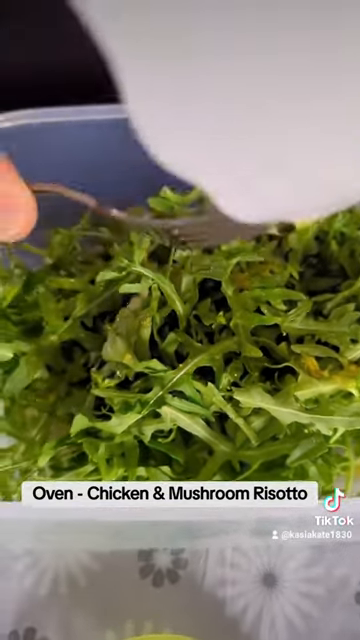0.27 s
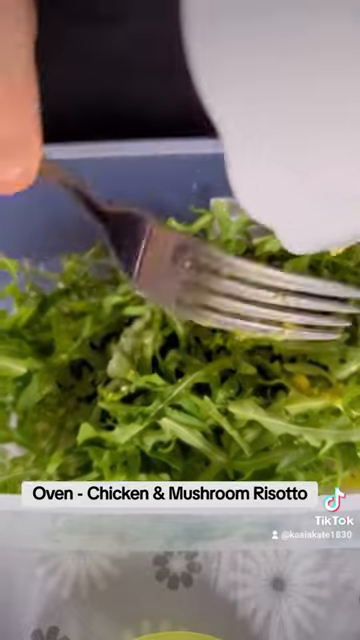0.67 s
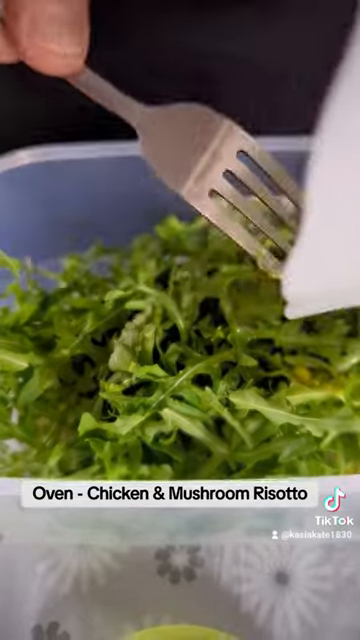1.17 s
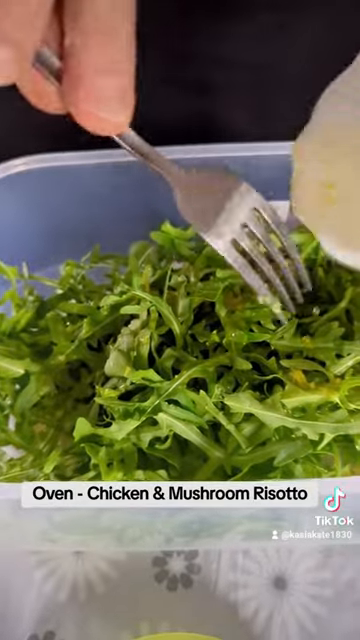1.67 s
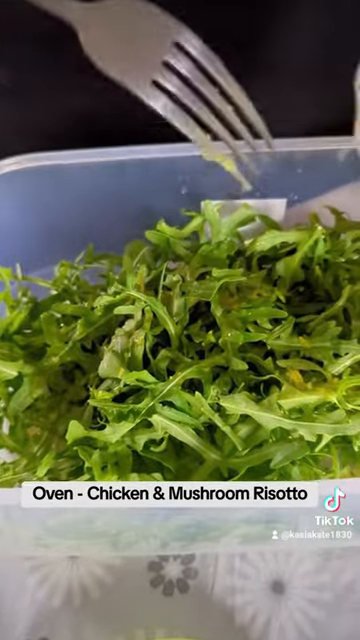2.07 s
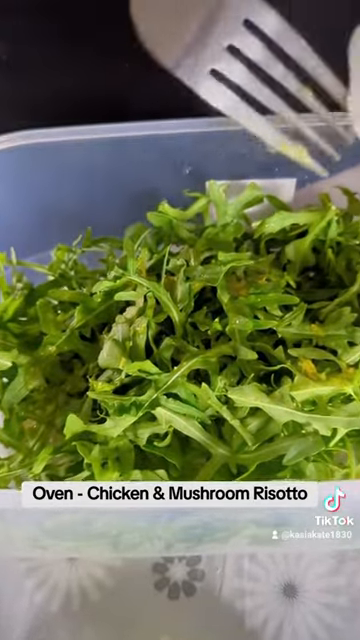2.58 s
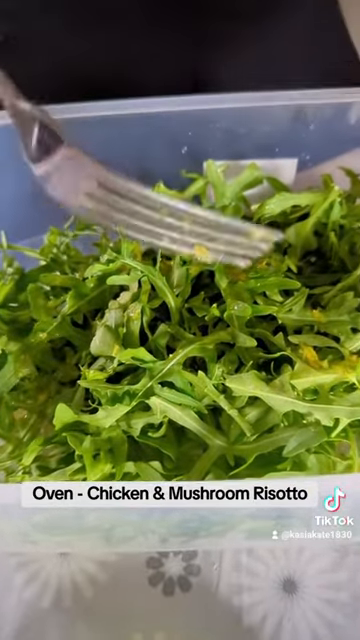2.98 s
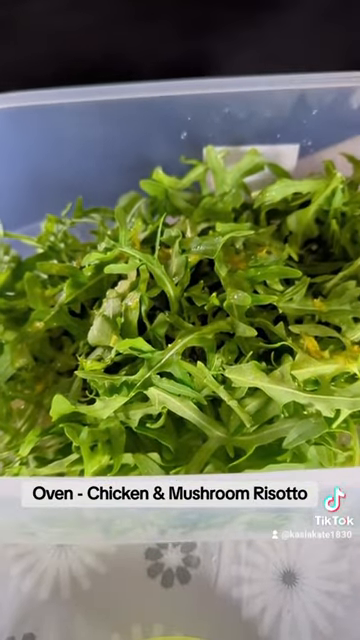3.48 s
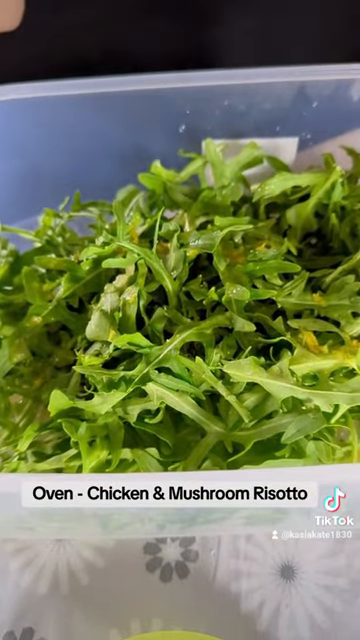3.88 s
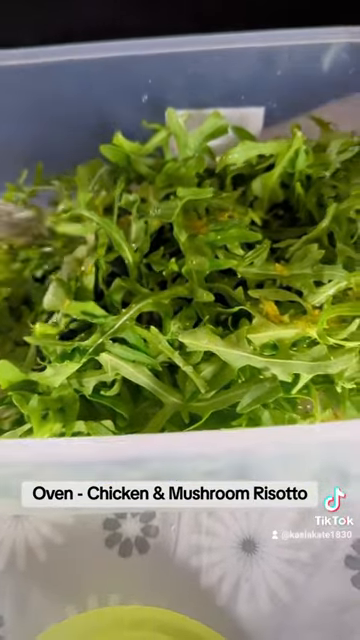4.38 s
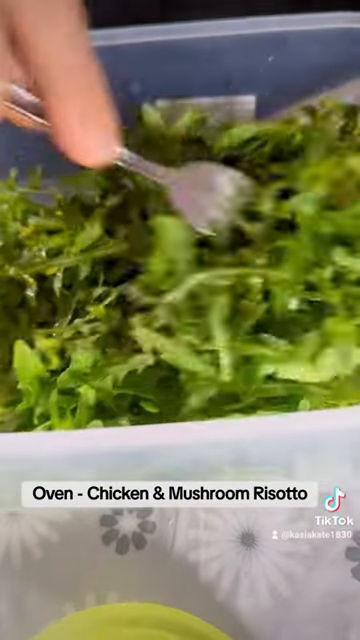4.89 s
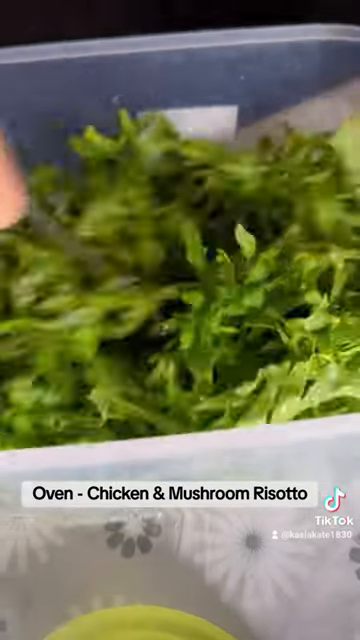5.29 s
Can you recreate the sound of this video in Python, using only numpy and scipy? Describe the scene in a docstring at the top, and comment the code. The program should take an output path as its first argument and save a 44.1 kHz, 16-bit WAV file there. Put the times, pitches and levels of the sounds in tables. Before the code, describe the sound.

A fork clinks and scrapes on a glazed dish, then salad leaves rustle as a plastic tub thumps dully on a counter.

```python
"""A quiet kitchen with an appliance hum. A fork taps a glazed dish and rings its modes; the tines scrape
and squeal on the glaze, and the walls answer briefly. The dish knocks softly on a plastic tub, which
judders twice in stick-slip along the counter while the fork works on. From 4.3 s salad leaves crinkle
as they are tossed: the tub rocks, the tines tick on its wall and its base thumps on the counter."""
import sys
import numpy as np
from scipy import signal
from scipy.fft import rfft, irfft, next_fast_len
from scipy.io import wavfile

SR = 44100
rng = np.random.default_rng(int(sys.argv[2]) if len(sys.argv) > 2 else 0)


def to_wav(sig):
    """Store sig (one row per channel, or 1-D mono) as 16-bit WAV at the path in sys.argv[1].

    Samples outside -1..1 are clipped; the rate is SR.
    """
    pcm = np.clip(np.atleast_2d(sig), -1, 1) * 32767
    pcm = np.round(pcm).astype(np.int16)
    wavfile.write(sys.argv[1], SR, pcm.T)  # frames by channels


N = 243784

# dish modes in seven groups, low to high: f/Hz, level/dB, t60/s
DISH_MODES = [
    [(804, -3.5, 0.41), (1070, -7.5, 0.1)],
    [(1764, -3.5, 0.12), (1861, -2, 0.076)],
    [(2530, -16.5, 0.074), (2890, -11, 0.084), (3077, 1.5, 0.1), (3820, -12.5, 0.051)],
    [(4417, -10, 0.045), (4533, 0.5, 0.12), (4640, -3.5, 0.031), (5395, -13, 0.089)],
    [(6220, -1, 0.075), (6314, 3, 0.11)],
    [(7160, -6, 0.06), (8000, -6.5, 0.021), (8350, -5.5, 0.027), (8530, -4, 0.072)],
    [(9000, -13, .04), (10200, -5.5, 0.056), (10790, -6.5, .04), (11300, -4, 0.035), (11640, -0.5, 0.037),
     (12700, -5, .04), (12700, -7.5, 0.057), (14240, -7, 0.027)],
]


def amp(db):
    """Level in dB to gain."""
    return 10 ** (np.asarray(db) / 20)


def unit(x):
    """x at rms 1."""
    return x / np.sqrt(np.mean(x ** 2) + 1e-20)


def noise(size, channels=1):
    """White noise, channels x size."""
    return rng.standard_normal((channels, max(size, SR)))[:, :size]


def wobble(size, step_s):
    """Random curve, one knot per step."""
    knots = rng.standard_normal(4096)
    return np.interp(np.arange(size) / SR / step_s, np.arange(len(knots)), knots)


def gritty(size, grit_db, grain_s):
    """Noise whose level jumps from grain to grain."""
    return unit(noise(size)[0] * amp(grit_db * np.minimum(wobble(size, grain_s) ** 2, 5)))


def along(points, hz):
    """(f/Hz, value) points interpolated on a log axis."""
    f, values = np.transpose(points)
    return np.interp(np.log(hz + 1), np.log(f + 1), values)


def curves(rows):
    """Per-sample curves of the columns after t/s, and a gate with 47 ms fades."""
    times_s, *columns = np.transpose(rows)
    t = np.arange(times_s[0], times_s[-1], 1 / SR)
    gate = np.clip(np.minimum(t - times_s[0], times_s[-1] - t) / 0.047, 0, 1)
    return [np.interp(t, times_s, column) for column in columns], gate


def swell(swell_s, fade_s):
    """Time from the peak, and a gain with a rounded crest: 20 dB up per swell_s, down per fade_s."""
    crest_s = min(0.0065, swell_s)
    t = np.arange(-2 * swell_s, 2 * fade_s, 1 / SR)
    return t, amp(-20 * (np.hypot(t, crest_s) - crest_s) / np.where(t < 0, swell_s, fade_s))


def filtered(x, response):
    """x through a complex frequency response."""
    size = next_fast_len(x.shape[-1] + 4096)
    return irfft(rfft(x, size) * response(np.fft.rfftfreq(size, 1 / SR)), size)[..., :x.shape[-1]]


def resonances(modes):
    """Causal response of modes (f/Hz, width/Hz, level/dB), alternating in sign."""
    return lambda f: sum((-1) ** k * amp(db) * 1j * f * width / (hz * hz - f * f + 1j * f * width)
                         for k, (hz, width, db) in enumerate(modes))


def stereo(pair, spectrum, correlation):
    """Two independent noises, coloured and mixed to a left-right correlation."""
    def response(hz):
        angle = np.arccos(np.clip(along(correlation, hz), -1, 1)) / 2
        return amp(along(spectrum, hz)) * [np.cos(angle), np.sin(angle)]
    mid, side = filtered(pair, response)
    return unit(np.array([mid + side, mid - side]))


def dying(decay, size):
    """Two noises decaying by (f/Hz, t60/s) points."""
    hz, t, bins = signal.stft(rng.standard_normal((2, size)), SR, nperseg=256)
    bins = bins * amp(-60 * t / along(decay, hz)[:, None])
    return signal.istft(bins, SR, nperseg=256)[1][:, :size]


def add(out, at_s, sound, pan_db):
    """Mix a sound in; pan is left minus right."""
    start = round(at_s * SR)
    size = min(sound.shape[-1], N - start)
    out[:, start:start + size] += amp([[pan_db / 2], [-pan_db / 2]]) * sound[..., :size]


def room_tone():
    """Kitchen air; the parts below and above 600 Hz drift separately in level."""
    spectrum = [(20, -54), (45, 3), (70, 0), (150, -8), (260, 1), (350, -1.5), (480, -11.5), (750, -17),
                (1050, -11.5), (1400, -14.5), (2000, -15.5), (3000, -19.5), (4800, -27), (6300, -22.5),
                (7600, -29.5), (16000, -43)]  # f/Hz, density/dB
    correlation = [(60, 0.47), (180, 1), (550, 0.52), (1650, 0.003), (4970, 0.35), (15000, -0.37)]  # f/Hz, left-right correlation
    drift = [(0, -63.5, -65.5), (.3, -60.5, -70.5), (.7, -64.5, -74), (1, -69.5, -77.5),
             (1.9, -73.5, -79.5), (2.3, -69.5, -72), (2.8, -70, -75.5), (4.0, -70, -74.5),
             (4.4, -69, -77.5), (4.7, -70, -65), (5.53, -66.5, -67.5)]  # t/s, low level/dB, upper level/dB
    times_s, low_db, upper_db = np.transpose(drift)
    t = np.arange(N) / SR
    tone = stereo(noise(N, channels=2), spectrum, correlation)
    upper = filtered(tone, lambda hz: hz > 600)
    low = amp(np.interp(t, times_s, low_db)) * unit(tone - upper)
    return low + amp(np.interp(t, times_s, upper_db)) * unit(upper)


def appliance_hum():
    """Mains hum: two tones wavering in level and phase."""
    tones = [(54, 24, -73.5), (103.8, 63, -63)]  # f/Hz, phase waver rate/Hz, level/dB
    out, t = np.zeros(N), np.arange(N) / SR
    for hz, waver_hz, db in tones:
        gain = amp(db + 5.1 * wobble(N, step_s=0.024))
        out += gain * np.sin(2 * np.pi * (hz * t + 0.16 * wobble(N, step_s=1 / waver_hz)))
    return out


def spot_levels(spot):
    """Drive in dB of each dish mode, and of the click, where the fork meets the dish."""
    spots = {"rim": (-17, -25.5, -6.5, 1, -14, -22.5, -10, -8.5),
             "well": (-27, -5, -9, -11.5, -7.5, -13, -25, -3),
             "wall": (-27.5, -37.5, -16.5, -16.5, -7.5, -13, -17.5, -14),
             "lip": (-39.5, -32, -13.5, -28.5, -17, -12.5, -15, -6),
             "base": (-52, -14, -19.5, -14.5, -11, -7.5, -17, -18.5),
             "shoulder": (-56.5, -8, -13, -2.5, -10.5, -8, -15, -3),
             "foot": (-2, -25, -10, 3.5, -9, -16.5, -14, -10),
             "heel": (-4.5, -2.5, -20.5, -18.5, -15, -13.5, -15, -12),
             "edge": (-39.5, -33.5, -12, -19.5, -1.5, -17, -6, -9.5),
             "flank": (-35.5, -28.5, -26, -27, 2, -24.5, -12.5, -14.5),
             "notch": (-40, -20, 0, -12, -25, -20, -25, -14),
             "side": (-23.5, -5, -7.5, -11.5, -21.5, -19, -23, -6.5),
             "bowl": (-40, -44, -7.5, -17.5, -11.5, -7.5, -4, -10.5),
             "tip": (-26.5, -15.5, -18.5, -29, -11, -13, -10.5, -15.5)}  # spot: level/dB of the seven mode groups, click level/dB
    *groups_db, click_db = spots[spot]
    return np.repeat(groups_db, [len(group) for group in DISH_MODES]), click_db


def clinks():
    """Fork strikes ring the dish; the resting fork shortens the ring, less so below damp_hz."""
    strikes = [(0.0268, -21, "well", 2, 0.14), (0.035, -30, "shoulder", 11, 0.081),
               (0.0516, -32, "lip", 3, 0.11), (0.2548, -41, "tip", -2, 0.16),
               (0.2583, -38.5, "tip", 8, 0.039), (0.5386, -56, "side", 3, 0.35),
               (0.5445, -66, "side", 3, 0.24), (0.6971, -18.5, "rim", 3.5, 0.21),
               (0.7046, -27.5, "edge", 4, 0.23), (0.8869, -59, "rim", 2, 0.36),
               (0.9288, -63.5, "rim", 7, 0.29), (1.1694, -45, "lip", 3.5, 0.42),
               (1.2076, -61, "edge", -7, 0.26), (1.4446, -37, "bowl", 7.5, 0.47),
               (1.6836, -68.5, "side", 9, 0.39), (2.494, -22.5, "wall", 2, 0.3),
               (2.6203, -44, "flank", 9, 0.21), (2.625, -47, "flank", 11, 0.18),
               (2.636, -47, "flank", 4.5, 0.24), (2.6455, -33, "flank", 9, 0.24),
               (2.653, -38, "flank", 5, 0.24), (3.7407, -21.5, "base", 0.5, 0.32),
               (2.7, -47, "rim", 1, 0.43), (3.9397, -42, "notch", 2, 0.21)]  # t/s, level/dB, spot, pan/dB, share of free ring time
    damp_hz = 1980
    out, t = np.zeros((2, N)), np.arange(SR // 8) / SR
    hz, mode_db, t60_s = np.transpose(sum(DISH_MODES, []))
    phase = 2 * np.pi * np.outer(hz, t)
    for at_s, db, spot, pan_db, share in strikes:
        spot_db, click_db = spot_levels(spot)
        gain = amp(mode_db + spot_db + rng.normal(0, 1.0, len(hz)))
        damped_t60_s = t60_s * max(share, 0.05) ** np.minimum(hz / damp_hz, 1)
        fade = amp(-60 * t / damped_t60_s[:, None])
        skew_rad = rng.normal(0, 0.3, len(hz))  # modes reach left and right out of step
        mid = gain * np.cos(skew_rad) @ (fade * np.sin(phase))
        side = gain * np.sin(skew_rad) @ (fade * np.cos(phase))
        ring = np.array([mid + side, mid - side])
        hiss = filtered(rng.standard_normal((2, len(t))),
                        lambda f: f / (f + 900) / (1 + (f / 12000) ** 2))
        click = (amp(click_db - 60 * t / 0.052) + amp(click_db - 60 * t / 0.0024)) * hiss
        add(out, at_s, amp(db) * (ring + click) * (1 - np.exp(-t / 0.0016)), pan_db)
    return out


def touching(at_s, t):
    """Gain round a stroke: zero before the fork lands, 20 dB down per 27 ms after it lifts."""
    contacts = [(.025, .29), (.695, .938), (1.168, 1.26), (1.443, 1.63), (2.492, 2.735), (3.739, 3.955)]  # fork on dish: landing/s, lift/s
    land_s, lift_s = [span for span in contacts if span[0] <= at_s][-1]
    return (at_s + t > land_s) * amp(-20 * np.maximum(at_s + t - lift_s, 0) / 0.027)


def scrapes():
    """Grit under the tines drives the dish modes, part free, part widened by the fork's pressure."""
    # tines dragged on the glaze: peak t/s, level/dB, swell/s, fade/s, spot, pressed re free modes/dB
    drags = [(.218, -55, .08, .006, "heel", -4), (.21, -57, .06, .006, "tip", -3),
             (.81, -66, .15, .28, "foot", 0), (.76, -65.5, .004, .17, "heel", -17),
             (1.535, -64, .03, .07, "wall", -7), (1.552, -62, .06, .02, "foot", -16),
             (2.565, -56.5, .135, .12, "edge", -20), (2.652, -52.5, .2, .006, "flank", -9.5),
             (3.9, -53, .11, .03, "flank", -6), (3.942, -54, .15, .012, "shoulder", -3),
             (2.71, -57, .09, .06, "rim", -14.5)]
    skids = [(.037, -39, .006, "shoulder", 0), (.053, -44, .006, "shoulder", 5),
             (.054, -53, .16, "well", 1), (.258, -45, .006, "tip", -1), (.706, -45, .06, "rim", 3),
             (.71, -55, .2, "tip", -1), (1.171, -64, .09, "tip", -3.5), (1.447, -49, .04, "tip", -3),
             (2.497, -37, .015, "wall", -14), (2.5, -47, .15, "wall", -24), (2.5, -56, .08, "edge", -22),
             (3.742, -42, .03, "base", -8), (3.745, -55, .27, "base", -12)]  # after landing: t/s, level/dB, fade/s, spot, pressed re free modes/dB
    skid_swell_s, detune = 0.002, 0.006  # pressure detunes the modes from stroke to stroke
    out = np.zeros((2, N))
    hz, mode_db, t60_s = np.transpose(sum(DISH_MODES, []))
    strokes = [(at_s, db, skid_swell_s, *rest) for at_s, db, *rest in skids] + drags
    for at_s, db, swell_s, fade_s, spot, pressed_db in strokes:
        t, gain = swell(min(swell_s, at_s / 2), fade_s)
        level_db = mode_db + spot_levels(spot)[0]
        detuned_hz = hz * (1 + detune * noise(len(hz))[0])
        pressed = resonances(list(zip(hz, 0.16 * hz, level_db + pressed_db)))
        free = resonances(list(zip(detuned_hz, 7.5 / t60_s, level_db)))
        grit = gritty(len(t), grit_db=1.13, grain_s=0.003)
        rasp = unit(filtered(grit, lambda f: pressed(f) + free(f)))
        pair = np.array([rasp, np.roll(rasp, 1)])
        add(out, at_s + t[0], amp(db) * gain * touching(at_s, t) * pair, pan_db=1.5)
    return out


def squeals():
    """Dragging tines squeal or set one dish tone singing: narrow noise on a steady or gliding pitch."""
    # peak t/s, level/dB, swell/s, fade/s, f at peak/Hz, glide/(Hz/s), roughness as share of f
    strokes = [(.196, -54, .014, .025, 6000, 40000, .065), (.81, -64, .02, .03, 1100, 0, .04),
               (1.535, -60, .035, .055, 1060, -1500, .07), (2.52, -55, .012, .025, 4620, 0, .01),
               (2.563, -57, .04, .06, 3090, 0, .015), (2.61, -56, .025, .01, 5800, -5000, .04),
               (2.635, -65, .04, .04, 1100, -1500, .05), (2.636, -47, .035, .015, 6400, 9000, .05),
               (2.65, -54, .04, .03, 11500, -15000, .04), (2.655, -47, .025, .012, 6550, -5000, .05),
               (2.695, -59, .025, .025, 5100, -15000, .04), (2.705, -66, .04, .03, 870, -1500, .04),
               (2.675, -56, .015, .02, 6200, -25000, .05), (2.714, -56, .03, .06, 4640, 0, .022),
               (3.77, -61, .015, .04, 4620, 0, .025), (3.903, -54, .025, .008, 6900, 15000, .05),
               (3.915, -62, .04, .04, 2120, 10000, .065), (3.915, -63, .025, .04, 1420, 0, .065),
               (3.93, -61, .02, .015, 5250, -10000, .04), (3.94, -47, .02, .01, 2840, 3000, .02),
               (3.941, -55, .012, .015, 4500, 0, .03), (3.97, -64, .02, .1, 3100, -2000, .07)]
    out = np.zeros((2, N))
    for at_s, db, swell_s, fade_s, hz, glide_hz_per_s, roughness in strokes:
        t, gain = swell(swell_s, fade_s)
        phase = 2 * np.pi * (hz * t + glide_hz_per_s * t ** 2 / 2)
        chatter = unit(filtered(noise(len(t), channels=2), lambda f: 1 / (1 + (f / (roughness * hz)) ** 2)))
        tone = np.cos(phase) * chatter[0] + np.sin(phase) * chatter[1]
        add(out, at_s + t[0], amp(db - 3) * gain * tone, pan_db=5)
    return out


def knock():
    """The dish's foot knocks softly on the tub: a few short, low modes."""
    modes = [(164, 3, .14), (337, -5.5, 0.15), (437, -7.5, 0.11), (565, -0.5, 0.041), (793, -6, 0.035)]  # f/Hz, level/dB, t60/s
    out, t = np.zeros((2, N)), np.arange(SR // 6) / SR
    ring = sum(amp(db - 60 * t / t60_s) * np.sin(2 * np.pi * hz * t) for hz, db, t60_s in modes)
    rise = 1 - np.exp(-t / 0.0032)
    add(out, at_s=0.197, sound=amp(-42.5) * ring * rise, pan_db=6.5)
    return out


def slides():
    """The tub sticks and slips on the counter: uneven low pulses, hiss in its upper resonances."""
    moves = [
        [(.285, 93, -72, -76), (.3, 108, -49, -59.5), (.37, 84, -53, -68.5), (.43, 75, -54, -69.5),
         (.5, 64, -56, -70), (.54, 95, -61.5, -64.5), (.64, 101, -55, -72), (.69, 200, -74, -54)],
        [(2.1, 100, -93, -84), (2.27, 112, -78, -78.5), (2.31, 140, -71, -70.5), (2.49, 166, -65, -69)],
    ]  # per slide: t/s, slip rate/Hz, judder level/dB, hiss level/dB
    slip_spectrum = [(50, -27.5), (110, 4), (210, -3), (320, -3.5), (400, -30), (800, -28), (2500, -89)]  # f/Hz, level/dB
    rub_modes = [(820, 49, -1), (1287, 28, 3), (2000, 200, -1.5)]  # f/Hz, width/Hz, level/dB
    out, rub = np.zeros((2, N)), resonances(rub_modes)
    for rows in moves:
        (rate_hz, judder_db, hiss_db), gate = curves(rows)
        size = len(gate)
        waver = 1 + 0.062 * wobble(size, step_s=0.014)
        slip_count = np.floor(np.cumsum(rate_hz * waver) / SR)
        slips = np.diff(slip_count, prepend=0) * amp(1.9 * noise(size)[0])
        judder = unit(filtered(slips, lambda hz: amp(along(slip_spectrum, hz))))
        hiss = unit(filtered(noise(size, channels=2), lambda f: rub(f) / (1 + (f / 2600) ** 4)))
        add(out, rows[0][0], gate * (amp(judder_db) * judder + amp(hiss_db) * hiss), pan_db=3.5)
    return out


def rocking():
    """The tub rocks under the fork: a low rumble."""
    levels = [(4.3, -75), (4.45, -63), (4.7, -55), (5.3, -70.5), (5.452, -66), (5.528, -55)]  # t/s, level/dB
    spectrum = [(30, -17), (60, 7), (150, -18), (400, -17), (800, -44.5)]  # f/Hz, density/dB
    out = np.zeros((2, N))
    (db,), gate = curves(levels)
    rumble = stereo(noise(len(gate), channels=2), spectrum, correlation=[(100, 0.98)])
    add(out, levels[0][0], gate * amp(db) * rumble, pan_db=-1.5)
    return out


def leaves():
    """Leaves crinkle round the fork: fluttering, grainy noise, split at 9 kHz into body and treble."""
    levels = [(4.33, -84, -105), (4.418, -71, -87), (4.427, -64, -71.5), (4.546, -59, -70),
              (4.568, -62.5, -80), (4.578, -64, -72), (4.592, -85, -88), (4.626, -64, -76.5),
              (4.702, -54.5, -66), (4.732, -59, -69), (4.812, -61, -68.5), (4.822, -58, -61.5),
              (5.006, -64.5, -79.5), (5.036, -81, -87.5), (5.082, -65, -71.5), (5.172, -70, -75),
              (5.188, -50.5, -70.5), (5.198, -60, -79), (5.218, -54, -67), (5.288, -64, -74.5),
              (5.322, -57.5, -67), (5.432, -80, -88), (5.481, -61.5, -73), (5.527, -58, -71)]  # t/s, body level/dB, treble level/dB
    spectrum = [(500, 2.5), (1200, 0.5), (2200, 1.5), (3500, 0), (5200, -2.5), (6300, 2.5), (7300, -5),
                (9500, -7.5), (11500, -5.5), (13800, -7.5), (16000, -20.5)]  # f/Hz, density/dB
    out = np.zeros((2, N))
    (body_db, treble_db), _ = curves(levels)
    size = len(body_db)
    crinkle = np.array([gritty(size, grit_db=1.24, grain_s=0.0011) for _ in range(2)])
    rustle = stereo(crinkle, spectrum, correlation=[(1000, 0.27), (10000, 0.22)])
    treble = filtered(rustle, lambda hz: 1 / (1 + (9000 / (hz + 1)) ** 8))
    flutter = amp(1.64 * wobble(size, step_s=0.017))
    toss = amp(body_db) * unit(rustle - treble) + amp(treble_db) * unit(treble)
    add(out, levels[0][0], flutter * toss, pan_db=3.0)
    return out


def ticks():
    """Tines tick on the tub's wall: a click and one short ring."""
    touches = [(4.4254, -56, 3520), (4.4578, -54, 3620), (5.076, -52, 2340), (5.185, -31, 2270),
               (5.1847, -37.5, 3460), (5.191, -33.5, 2090), (5.3224, -46, 2280), (5.469, -60, 2770)]  # t/s, level/dB, f/Hz
    out, t = np.zeros((2, N)), np.arange(SR // 40) / SR
    for at_s, db, hz in touches:
        hiss = filtered(rng.standard_normal((2, len(t))),
                        lambda f: f / (f + 2000) / (1 + (f / 7000) ** 2))
        click = 0.75 * amp(-60 * t / 0.0062) * hiss
        ring = 0.5 * amp(-60 * t / 0.014) * np.sin(2 * np.pi * hz * t)
        add(out, at_s, amp(db) * (ring + click), pan_db=7.5)
    return out


def thumps():
    """The tub lands: low modes and a dull thud; the counter passes it to the dish's lowest mode."""
    # t/s, level/dB, tilt/dB at 70 Hz, 400 Hz and 1 kHz, pan/dB; soft landings are duller
    landings = [(4.575, -8.5, -16.5, -13.5, -11.5, -2.5), (4.884, -62, 23, -21, -19, 0.5),
                (4.927, -20, -6.5, -12, -32, -3.5), (4.957, -39, -25, -30, -33, 5),
                (5.193, -30.5, -2.5, -10.5, -10.5, 0), (5.268, -46.5, 8, -37, -7, -3.5)]
    tub_modes = [(71, 1, 0.21), (146, -6, 0.35), (236.2, -0.5, 0.073), (247, -13, 0.304),
                 (303.7, -10, 0.18), (316.5, -4.5, 0.098), (354.4, -5.5, 0.17), (434, -22.5, 0.34),
                 (610, -12.5, 0.13), (870, -5.5, 0.021), (1053, -20, 0.23), (1313, -9.5, 0.025)]  # tub and counter: f/Hz, level/dB, t60/s
    mode_pan = [(70, 2.5), (380, -2.5), (1300, -4)]  # f/Hz, pan re landing/dB
    thud_spectrum = [(25, -23), (60, -0.5), (150, 0), (330, 0), (450, -3.5), (650, -4), (1200, -18),
                     (2000, -30.5), (4000, -52.5), (8000, -85)]  # f/Hz, density/dB
    thud_decay = [(60, 0.43), (250, 0.2), (600, 0.15), (1200, 0.23), (3000, .13)]  # f/Hz, t60/s
    out, t = np.zeros((2, N)), np.arange(SR // 3) / SR
    hz, mode_db, t60_s = np.transpose(tub_modes)[:, :, None]
    rise = 1 - np.exp(-t * hz / 1.05)  # about one cycle
    modes = amp(mode_db - 60 * t / t60_s) * rise * np.sin(2 * np.pi * hz * t)
    lean_db = np.outer([0.5, -0.5], along(mode_pan, hz[:, 0]))
    dish = amp(-39.5 - 60 * t / 0.69) * np.sin(2 * np.pi * DISH_MODES[0][0][0] * t)
    for at_s, db, deep_db, body_db, bright_db, pan_db in landings:
        tilt = [(70, deep_db + 10), (150, 0.0022), (400, body_db + 7), (1000, bright_db + 8.5)]
        ring = amp(along(tilt, hz[:, 0]) + lean_db) @ modes
        mid, spread = filtered(dying(thud_decay, len(t)),
                               lambda f: amp(along(thud_spectrum, f) + along(tilt, f)))
        side = 0.3 * spread + 4 * np.gradient(spread)
        thud = np.array([mid + side, mid - side]) * (1 - np.exp(-t / 0.001))
        add(out, at_s, amp(db) * (dish + amp(-3) * ring + amp(12) * thud), pan_db)
    return out


def with_walls(pair, wet_db):
    """A sound plus the walls' short answer, 6 ms later and different on each side."""
    decay = [(200, 0.15), (2000, 0.21), (6000, 0.22), (14000, 0.15)]  # f/Hz, t60/s
    tail = np.pad(dying(decay, SR // 4), ((0, 0), (260, 0)))
    return pair + amp(wet_db) * signal.oaconvolve(pair, tail / np.linalg.norm(tail[0]), axes=1)[:, :N]


def scene():
    """Stereo sum; only the fork's sounds reverberate."""
    fork = with_walls(clinks() + scrapes() + squeals() + ticks(), wet_db=-7.0)
    return fork + knock() + thumps() + slides() + leaves() + rocking() + room_tone() + appliance_hum()


def record(dry):
    """Microphone: third-order bass roll-off and a hard band limit."""
    bass_hz, top_hz = 33, 16200
    return filtered(dry, lambda hz: (hz < top_hz) * (1j * hz / (1j * hz + bass_hz)) ** 3)


dry = scene()
out = record(dry)
to_wav(out)
```